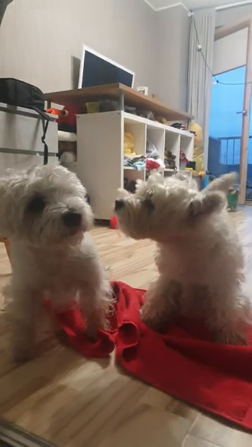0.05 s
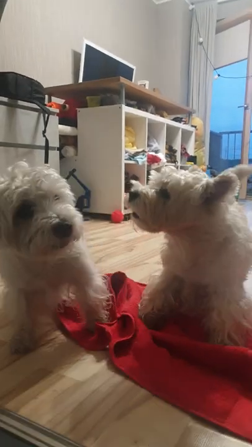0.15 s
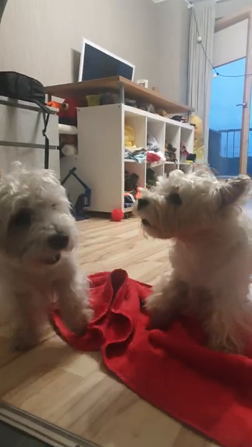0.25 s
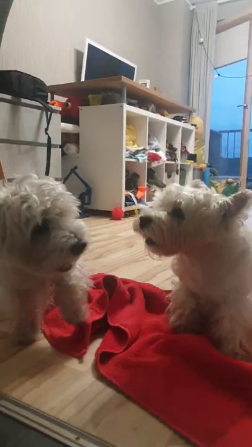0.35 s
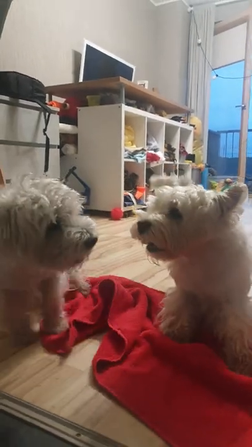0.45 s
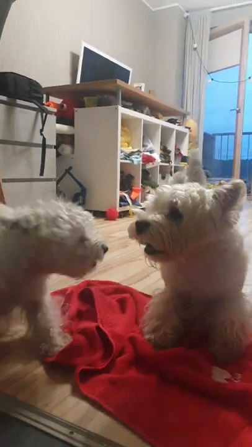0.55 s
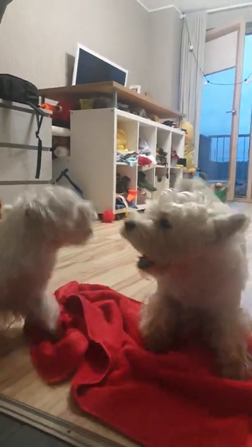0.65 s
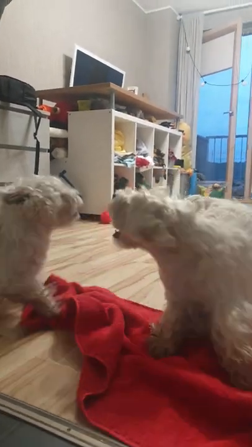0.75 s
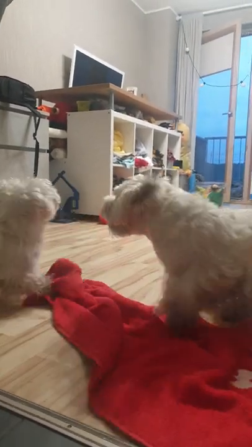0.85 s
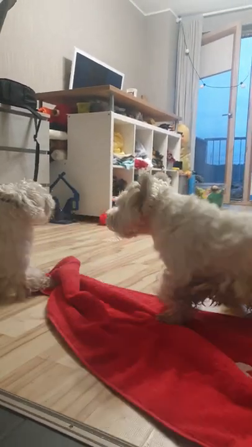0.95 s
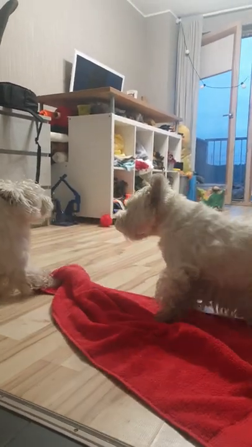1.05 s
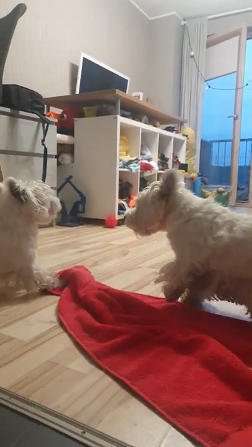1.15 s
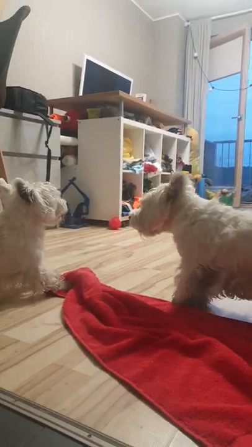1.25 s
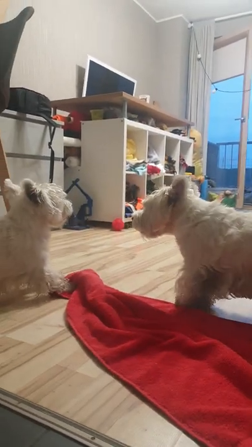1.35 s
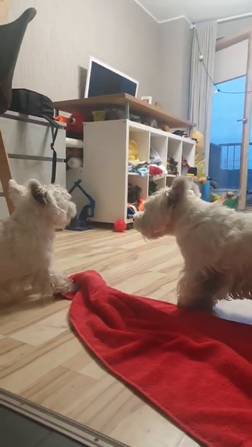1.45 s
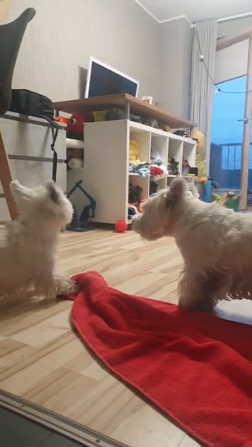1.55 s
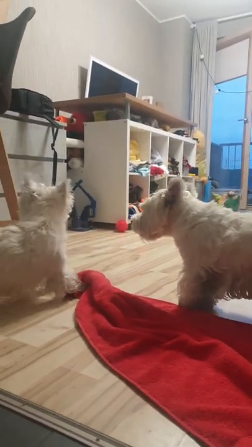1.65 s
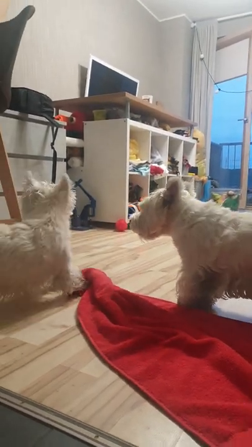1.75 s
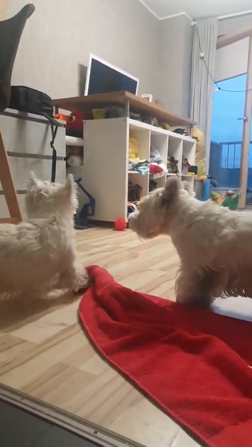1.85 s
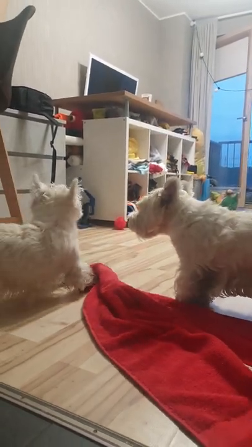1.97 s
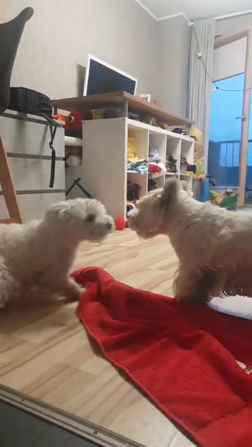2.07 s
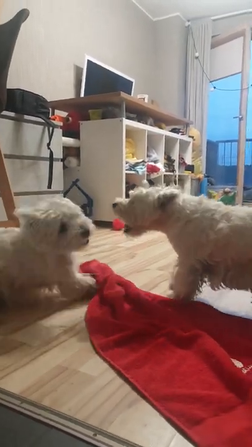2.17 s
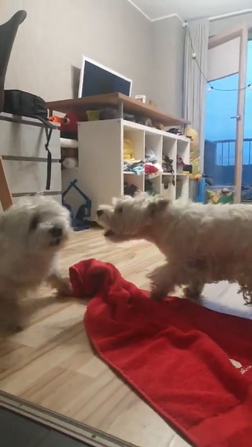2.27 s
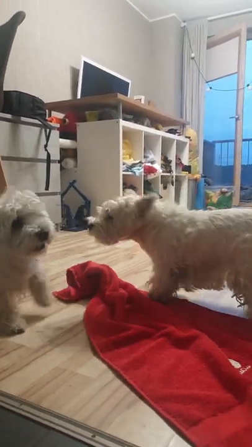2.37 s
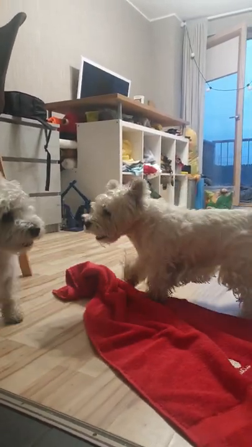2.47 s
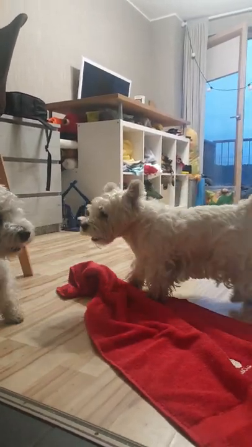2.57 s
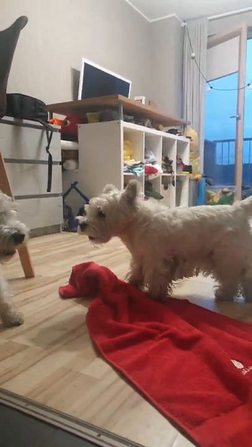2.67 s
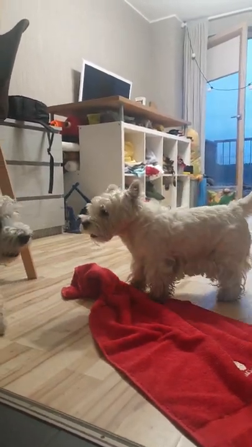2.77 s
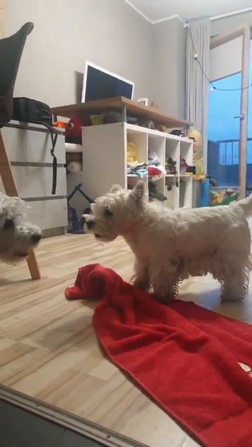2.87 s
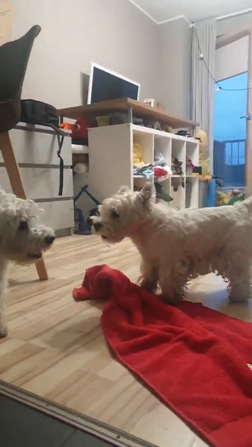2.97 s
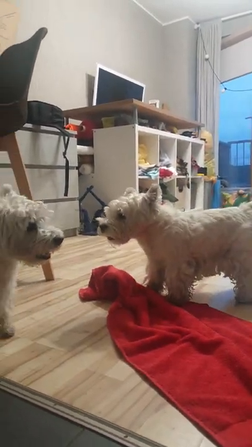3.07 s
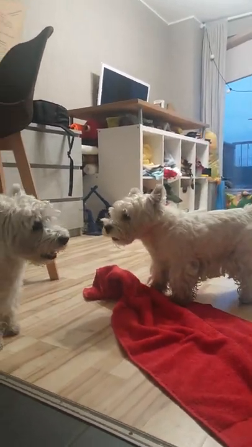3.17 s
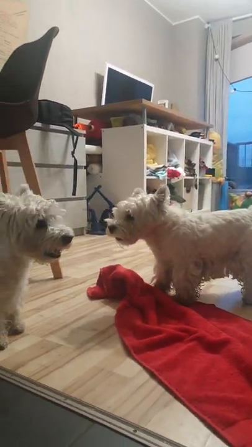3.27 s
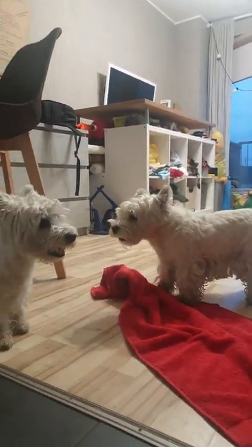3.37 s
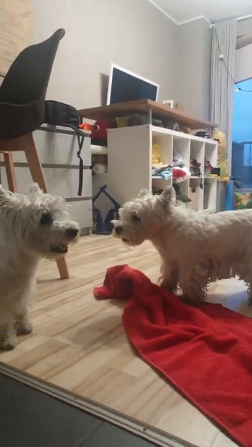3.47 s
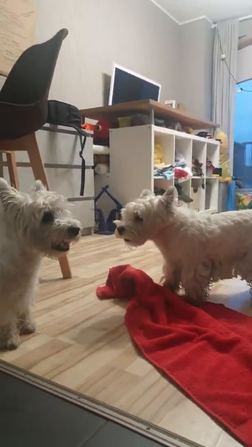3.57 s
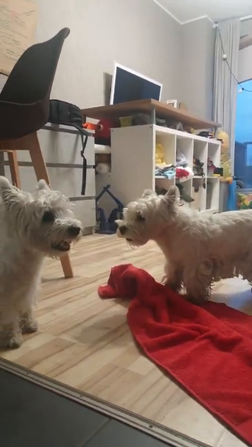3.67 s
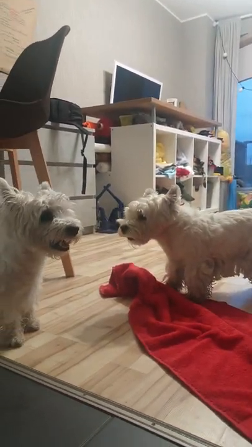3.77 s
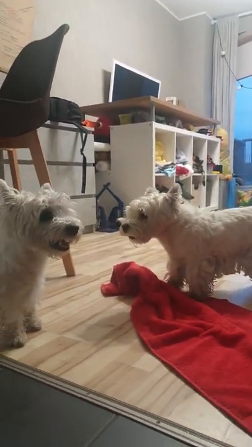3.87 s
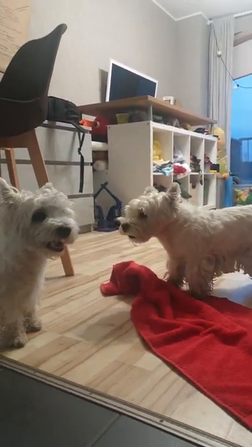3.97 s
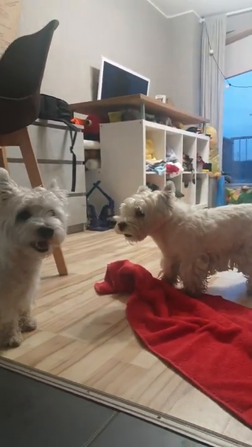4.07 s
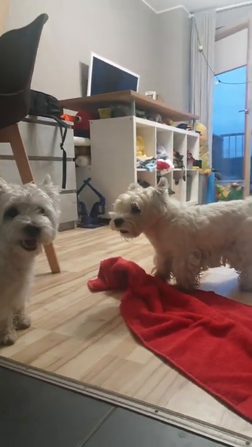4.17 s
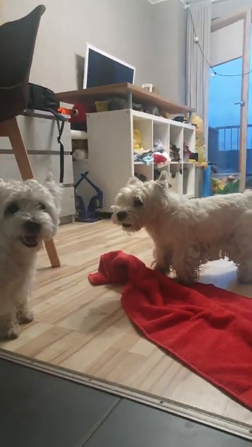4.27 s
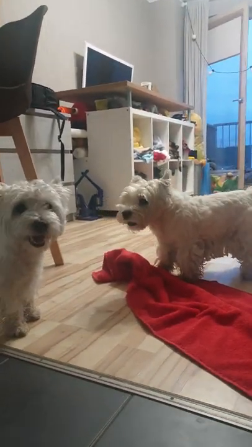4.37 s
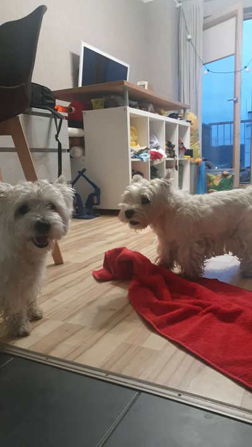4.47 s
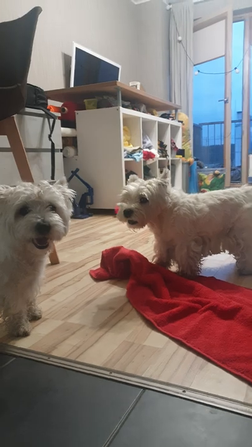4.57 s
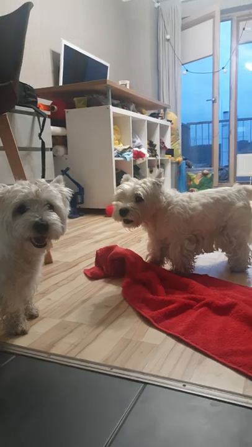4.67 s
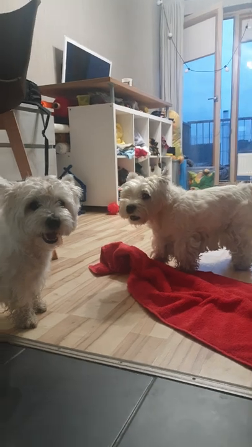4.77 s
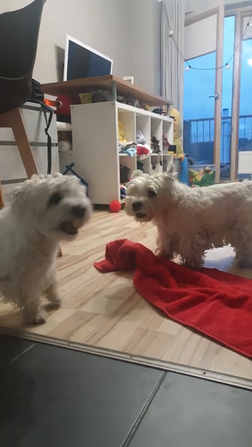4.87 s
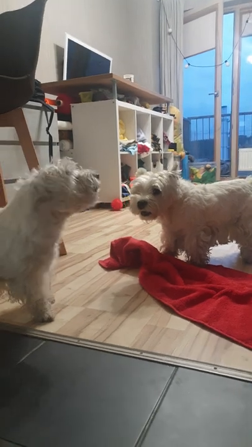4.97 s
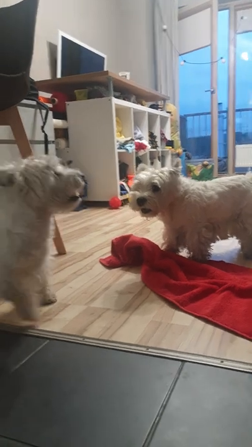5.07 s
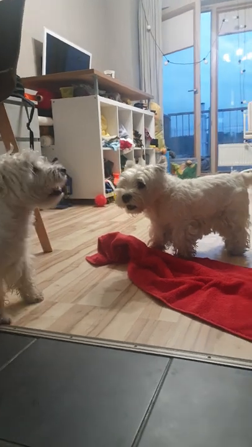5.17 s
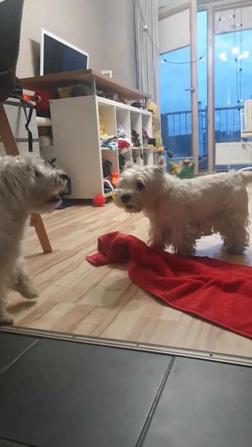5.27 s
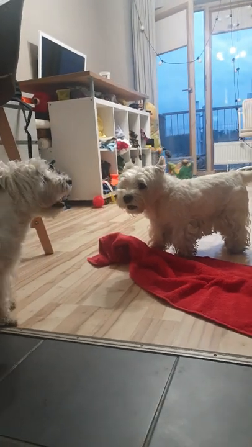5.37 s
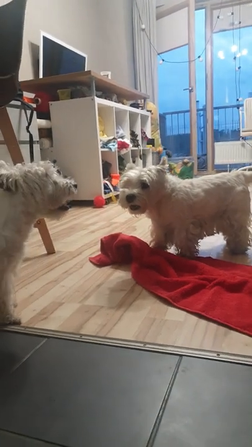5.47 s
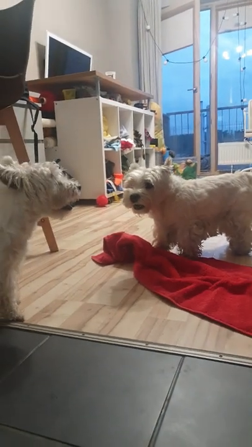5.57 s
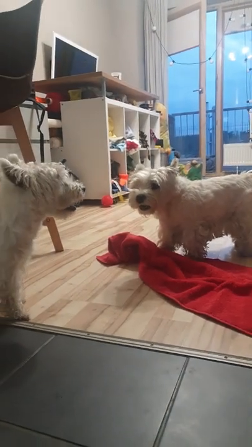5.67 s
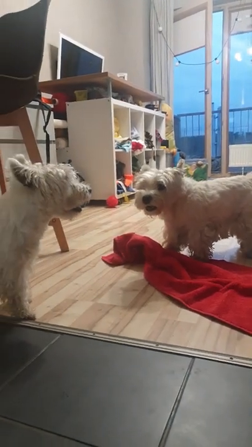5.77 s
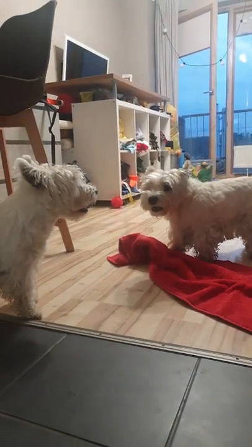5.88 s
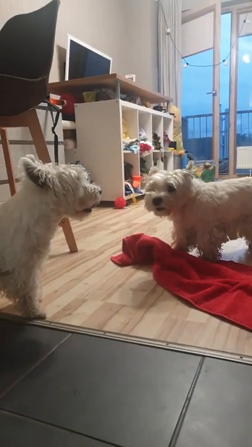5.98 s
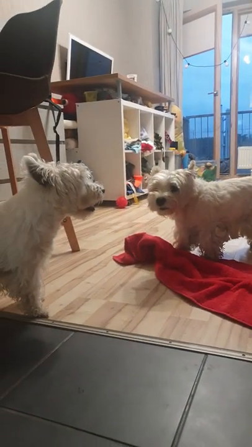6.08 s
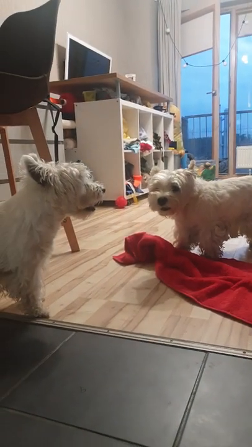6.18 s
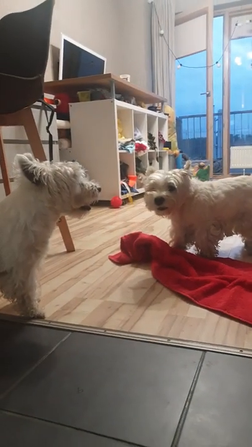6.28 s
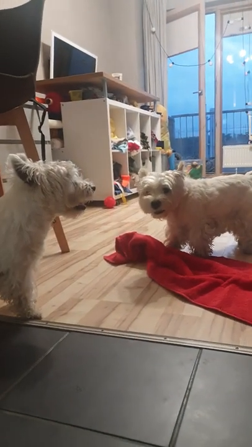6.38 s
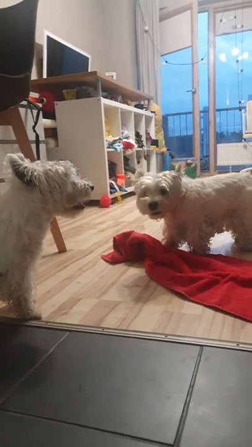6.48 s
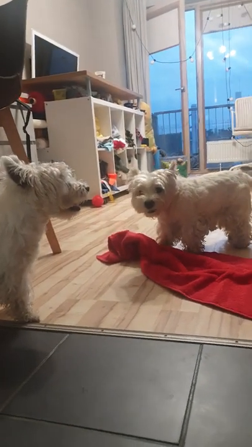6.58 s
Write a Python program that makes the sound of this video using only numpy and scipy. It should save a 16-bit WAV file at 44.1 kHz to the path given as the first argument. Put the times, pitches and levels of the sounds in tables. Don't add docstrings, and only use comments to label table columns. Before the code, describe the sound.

Two sharp small-dog barks, about a second and a half apart, ring through a quiet living room amid ticking claws, paw thumps and soft snorts.

```python
import sys
import numpy as np
from scipy import signal
from scipy.fft import rfft, irfft, next_fast_len
from scipy.io import wavfile
from scipy.ndimage import uniform_filter1d, minimum_filter1d

SR = 44100
rng = np.random.default_rng(int(sys.argv[2]) if len(sys.argv) > 2 else 0)


def wav_out(sig):
    wavfile.write(sys.argv[1], SR, np.round(np.clip(np.atleast_2d(sig).T, -1, 1) * 32767).astype(np.int16))


def decibels_to_gain(level_db):
    exponent = np.asarray(level_db, float) / 20
    return 10 ** exponent


N = 292277

# (time [s], effort [dB], pitch [Hz], mouth opening [dB])
BARKS = [
    [(.752, -56.5, 217.7, -14), (.78, -26.5, 280.5, -5), (.8, -16, 309.3, 0), (.83, -13.5, 380.7, 5),
     (.855, -15.5, 383.7, 9.5), (.875, -17, 373, 2.5), (.895, -15.5, 393.8, -7.5), (.915, -55.5, 368, -9.5)],
    [(2.17, -49, 231, -8), (2.205, -28.5, 304, -3.5), (2.225, -15.5, 311.5, -6), (2.245, -15, 322.9, 5),
     (2.265, -10.5, 420, 2.5), (2.292, -18, 514.5, 3.5), (2.315, -15, 526, -5.5),
     (2.345, -21.5, 534.6, -14.5), (2.37, -40, 545, -18.5)],
]
# (centre [Hz], width [Hz], level [dB])
BARK_THROATS = [
    [(714.4, 240, -15), (1141, 160, -0.5), (1484, 200, 1), (2234, 260, -4.5), (2987, 480, -17.5),
     (3840, 420, -20.5)],
    [(750, 130, -6), (1156, 200, 1), (1484, 390, -0.5), (2041, 470, -2), (2940, 410, -3), (3600, 600, -7.5)],
]
# (left over right [dB], right capsule lag [samples])
BARK_PLACES = [
    (1.5, 1),
    (-5, 4.3),
]
# (roughness at start [0-1], clearing [per s], clearest [0-1])
BARK_HOARSENESS = [
    (.75, 5, .4),
    (.9, 4.2, .2),
]
# (opening at start [dB], closing [dB per s])
BARK_JAWS = [
    (12, 149),
    (-8, 33),
]
# (frequency [Hz], density [dB per Hz])
BARK_AIR_COLOUR = [(600, -36.5), (3000, -12.5), (4500, -1.5), (7000, -2), (8600, -10), (10500, -8.5),
                   (12500, -4), (15500, -12), (17000, -40.5)]
BARK_AIR_DB = [-31.5, -29]
BARK_CHEST_DB = [-11, -11.5]
# (time [s], length [s], level [dB], pitch [Hz], sag [Hz per s])
GRUNTS = [
    (0, 0.058, -33, 198.4, 150),
    (1.056, 0.16, -41.5, 154, 289),
    (2.633, 0.116, -52.5, 142.3, 150),
    (4.903, 0.045, -43.5, 111, 30),
]
# (time [s], length [s], level [dB])
HUFF = (6.3, .1, -40)
# (centre [Hz], width [Hz], level [dB])
HUFF_THROAT = [(604, 200, -6), (1150, 116, -1.5), (2240, 300, 0.5), (3260, 155, -3), (4000, 170, -8.5)]
# (time [s], length [s], peak [dB], resonance [Hz], left over right [dB])
SNORTS = [
    (0.352, 0.16, -52, 1604, -13),
    (2.694, 0.14, -56.5, 1603, -2.5),
    (4.868, 0.092, -51, 1960, -9),
    (5.093, 0.19, -40.5, 1720, -5),
    (5.505, 0.12, -39, 2010, -7),
]
# (time [s], length [s], level [dB])
NOSE_AIR = [
    (5.0, 0.11, -56),
    (5.147, 0.079, -52),
    (5.435, 0.062, -46),
    (6.306, 0.062, -47.5),
]
# (time [s], peak [dB], low part [dB], left over right [dB])
CLAWS = [(0.1196, -34, -14.5, -9.5), (0.3619, -40, -2.5, -3), (0.5102, -42, -44, -4),
         (0.5773, -39.5, -6, 14), (0.5875, -28.5, -6.5, -14.5), (0.7173, -40.5, -26, -17),
         (1.0256, -35.5, -17.5, -1), (2.0206, -59.5, -15.5, -12), (2.0996, -27, -10, 1.5),
         (2.1244, -42, -15, -21), (2.328, -29, -12, -7), (2.4094, -34, -19, -6), (2.476, -32.5, -24, -3.5),
         (2.5242, -42.5, -10.5, 9), (2.667, -56.5, -16.5, -6), (2.9, -45.5, -13.5, -6.5),
         (2.924, -49, -19, -4), (3.5026, -57.5, -26, -10.5), (4.8828, -51, -10, -1), (4.9137, -50, -11, -5),
         (5.0004, -28.5, -8.5, 6), (5.026, -33.5, -28, -19), (5.1534, -37.5, -5.5, -28.5),
         (5.4316, -47.5, -6.5, -29.5)]
# (time [s], peak [dB], left over right [dB])
TIPS = [
    (.5882, -18, -9.5),
    (.523, -48, -4.5),
    (4.889, -50.5, -9),
    (4.977, -44, -15),
    (5.15, -29.5, -14),
]
# (time [s], peak [dB], pitch [Hz], 60 dB decay [s])
THUMPS = [(0.34, -51, 113, 0.17), (0.576, -33.5, 344, 0.047), (0.685, -45.5, 218, 0.061),
          (0.89, -42, 226.5, 0.19), (0.989, -48, 198, 0.062), (2.095, -39, 284, 0.043),
          (2.14, -45.5, 152.5, 0.25), (2.328, -29.5, 243, 0.058), (2.412, -36, 390, 0.024),
          (2.482, -44.5, 365, 0.052), (2.69, -46, 220, 0.076), (5, -41, 284, 0.088),
          (5.169, -30.5, 201, 0.067), (5.603, -44, 87, 0.077), (5.724, -57, 121.5, 0.078),
          (6.352, -19.5, 225, 0.028), (6.596, -43, 88, 0.096)]
# (time [s], peak [dB], pitch [Hz], 60 dB decay [s])
KNOCKS = [
    (0.588, -40, 531, 0.07),
    (2.1, -45.5, 586, 0.04),
    (2.664, -51, 598, 0.038),
    (5.0, -43.5, 627, 0.06),
    (5.148, -50.5, 455, 0.18),
    (6.336, -36.5, 483.4, 0.093),
]
# (time [s], length [s], hiss [dB], dull part [dB], left over right [dB])
SCUFFS = [(0, 0.057, -44, 15.5, -7.5), (.37, 0.13, -49.5, 0.5, 2), (0.521, .06, -44.5, -24, -3),
          (0.607, 0.068, -50, -11, -1), (0.711, 0.072, -42, -14, 8), (2.114, 0.18, -45.5, -3, -6),
          (4.913, 0.094, -47.5, -2, -13), (4.996, 0.11, -35.5, -25, -19.5), (5.156, .12, -40, -7, 14),
          (5.435, 0.12, -36.5, -7.5, -4.5), (6.318, .11, -37, -2, -13)]
# (frequency [Hz], density [dB per Hz])
SLIDE_HISS = [(1760, -36), (3000, -7), (4230, -5.5), (4730, -3.5), (6570, -8), (7940, -17), (11600, -19.5),
              (16000, -27.5)]
# (time [s], half length [s], level [dB])
RUSTLES = [(0, 0.37, -69), (2.054, .04, -72), (2.744, 0.04, -58.5), (2.932, 0.029, -60), (3.851, .25, -76),
           (4.7, 0.23, -80), (5.477, 0.034, -52)]
# (frequency [Hz], 60 dB decay [s])
ROOM_T60 = [(120, 0.36), (400, 0.45), (1000, 0.42), (2500, 0.41), (6000, 0.39), (14000, 0.35)]
# (centre [Hz], width [Hz], level [dB])
ROOM_BOOM = [(67, 14, -2.5), (94, 12, 0.5), (150, 42, 4.5), (216.2, 20, 1), (285.2, 25, 8)]
# (time [s], level [dB])
TRAFFIC = [(0, -69), (.6, -63.5), (1.2, -62), (1.45, -73.5), (1.8, -73.5), (2.15, -64.5), (2.6, -67),
           (3.1, -70.5), (3.45, -69.5), (3.9, -65.5), (4.2, -68.5), (4.63, -65.5), (4.95, -59),
           (5.3, -56.5), (5.7, -53.5), (6.63, -53.5)]
# (frequency [Hz], density [dB per Hz])
TRAFFIC_COLOUR = [(15, -64), (25, -37.5), (53, -5.5), (84, -3.5), (123, -11.5), (212, -10), (236, -15.5),
                  (270, -7.5), (344, -23), (1020, -18), (1100, -20), (2050, -26.5), (7310, -50),
                  (8360, -61), (16000, -53.5)]
# (level at mean loudness [dB], share of the swell [ratio])
TRAFFIC_LAYERS = [
    (7.5, 0.85),
    (-0.3, 0.9),
    (-17, 1.204),
]
# (frequency [Hz], likeness [0-1])
LIKENESS = [(60, 1), (180, 0.85), (550, 0.43), (1650, 0.0), (4970, 0), (15000, 0.03)]
EDGES = 25 * 2 ** np.arange(0, 9.6, .5)

CLAW_HZ, TIP_HZ = 5350, 11500
TRAFFIC_MEAN_DB = -66
ROOM_DB, ROOM_BASS_CUT_HZ, TIP_ROOM_DB = 0.5, 550, -8.5
RIGHT_CAPSULE_DB, CAPSULE_HISS_DB = 3.5, -87.5
BASS_SHARED_HZ, TOP_CUT_HZ = 420, 16400
TREBLE_DIP_HZ, TREBLE_DIP = 9000, 0.46


def rms_one(x):
    return x / np.sqrt(np.mean(x ** 2) + 1e-20)


def at_hz(points, hz):
    table_hz, values = np.transpose(points)
    return np.interp(np.log(hz), np.log(table_hz), values)


def span(rows):
    s, *columns = np.transpose(rows)
    t = np.arange(s[0], s[-1], 1 / SR)
    return [np.interp(t, s, column) for column in columns]


def low_pass(order, hz):
    return signal.butter(order, hz, fs=SR, output="sos")


def band(x, low_hz, high_hz, order=2):
    edges = [low_hz, min(high_hz, SR / 2.1)]
    return signal.sosfilt(signal.butter(order, edges, "band", fs=SR, output="sos"), x)


def resonance(x, hz, width_hz):
    r = np.exp(-np.pi * width_hz / SR)
    feedback = [1, -2 * r * np.cos(2 * np.pi * hz / SR), r * r]
    return signal.lfilter(np.array([1, 0, -1]) * (1 - r * r) / 2, feedback, x)


def drift(size, rate_hz):
    r = np.exp(-2 * np.pi * rate_hz / SR)
    white = rng.standard_normal(size + 4000)
    return rms_one(signal.lfilter([1], [1, -2 * r, r * r], white)[4000:])


def coloured(size, spectrum):
    hz = np.fft.rfftfreq(size, 1 / SR) + 1
    return rms_one(irfft(rfft(rng.standard_normal(size)) * decibels_to_gain(at_hz(spectrum, hz)), size))


def swell(length, rise_s, fall_db_per_s, end_s):
    t = np.arange(round(length * SR)) / SR
    rise, fade = np.minimum(1, t / rise_s), np.minimum(1, t[::-1] / end_s)
    return t, rise * decibels_to_gain(-fall_db_per_s * t) * fade


def add(out, sound, s, pan_db, lag):
    i, steps = max(round(s * SR), 0), np.arange(len(sound))
    early = np.interp(steps - 20., steps, sound, left=0)
    late = np.interp(steps - 20 - lag, steps, sound, left=0)
    pair = np.array([early * decibels_to_gain(pan_db / 2), late * decibels_to_gain(-pan_db / 2)])[:, 20:][:, :N - i]
    out[:, i:i + pair.shape[1]] += pair


def bark(rows, hoarseness, jaw, throat, air_db, chest_db):
    effort_db, pitch, mouth_db = span(rows)
    hoarse, clearing, clearest = hoarseness
    open_db, closing = jaw
    size = len(pitch)
    t = np.arange(size) / SR
    rough = np.clip(hoarse - clearing * t, clearest, 1)
    jaw_db = open_db - closing * t

    phase = 2 * np.pi * np.cumsum(pitch * (1 + .07 * rough * drift(size, 70))) / SR
    pulses = sum(np.cos(k * phase + 0.319 * k * k) * decibels_to_gain(3.5 * rough * drift(size, 140))
                 for k in range(1, 13)) / np.sqrt(6)
    gate = 1 + .7 * np.cos(phase)
    source = (1 - rough) * pulses + 1.1 * rough * gate * rng.standard_normal(size)

    peaks = []
    for k, (hz, width, db) in enumerate(throat):
        ringing = resonance(resonance(source, hz, 2 * width), hz, 2 * width)
        peaks.append(decibels_to_gain(db) * (-1) ** k * ringing)
    nose, low, high, *mouth = peaks
    voice = rms_one(nose + decibels_to_gain(-jaw_db / 2) * low + decibels_to_gain(jaw_db / 2) * high + decibels_to_gain(mouth_db) * sum(mouth))
    voice = signal.sosfilt(low_pass(6, 3830), voice)

    air = decibels_to_gain(air_db + 0.15 * mouth_db) * gate * coloured(size, BARK_AIR_COLOUR)
    chest = band(pulses + 5.9 * rough * rng.standard_normal(size), 260, 910)
    chest *= decibels_to_gain(chest_db - .12 * (pitch - 323.5))
    return decibels_to_gain(effort_db) * (voice + air + chest)


def grunt(length, level_db, pitch_hz, sag):
    t, envelope = swell(length, 0.0085, 97, 0.01)
    pitch, size = pitch_hz - sag * t, len(t)
    second_db = 2.5 - .2 * (pitch - 110)
    phase = 2 * np.pi * np.cumsum(pitch * (1 + 0.05 * drift(size, 57))) / SR
    upper = sum(np.sin(k * phase + k * k) * decibels_to_gain(2.9 * drift(size, 86)) for k in range(3, 9))
    voice = np.sin(phase) + decibels_to_gain(second_db) * np.sin(2 * phase) + decibels_to_gain(-25) * upper
    return decibels_to_gain(level_db) * envelope * voice


def huff(length, level_db):
    t, envelope = swell(length, .03, 70, 0.046)
    air = envelope * rng.standard_normal(len(t))
    peaks = [decibels_to_gain(db) * (-1) ** k * resonance(air, hz, width)
             for k, (hz, width, db) in enumerate(HUFF_THROAT)]
    return decibels_to_gain(level_db) * rms_one(sum(peaks))


def snort(length, peak_db, hz):
    envelope = swell(length, .025, 71.5, 0.067)[1]
    return decibels_to_gain(peak_db - 1.5) * turbulence(envelope, hz, 0, -11.5, -15.5)


def nose_air(length, level_db):
    envelope = swell(length, 0.023, 40.7, 0.057)[1]
    return decibels_to_gain(level_db) * envelope * rms_one(band(rng.standard_normal(len(envelope)), 9000, 17600))


def turbulence(envelope, centre_hz, body_db, hiss_db, low_db):
    size = len(envelope)
    grain = rng.standard_normal(size) * decibels_to_gain(2.2 * drift(size, 120))
    body = rms_one(resonance(grain, centre_hz, 550) - .8 * resonance(grain, 1.5 * centre_hz, 550))
    hiss = coloured(size, SLIDE_HISS)
    low = rms_one(band(grain, 350, 1300))
    return envelope * (decibels_to_gain(body_db) * body + decibels_to_gain(hiss_db) * hiss + decibels_to_gain(low_db) * low)


def claw(peak_db, hz, low_db):
    t = np.arange(round(0.085 * SR)) / SR
    decay = np.exp(-t / .0015) + 0.38 * np.exp(-t / 0.021)
    ringing, scrape = rng.standard_normal((2, len(t))) * decay
    tick = 2.4 * resonance(ringing, hz, 1800) + .5 * band(scrape, 2400, 15000)
    return decibels_to_gain(peak_db - 5.0) * (tick + decibels_to_gain(low_db + 9.5) * band(scrape, 600, 2900))


def tip(peak_db):
    t = np.arange(round(.02 * SR)) / SR
    burst = rng.standard_normal(len(t)) * np.exp(-t / .0012)
    return decibels_to_gain(peak_db) * (resonance(burst, TIP_HZ, 3000) + .6 * band(burst, 4500, 11000))


def thump(peak_db, hz, t60):
    t = np.arange(round(.3 * SR)) / SR
    fall = decibels_to_gain(-60 * t / t60) * (1 - np.exp(-t / 0.0022))
    puff = rms_one(band(rng.standard_normal(len(t)), 100, 710)) * fall
    panel = np.sin(2 * np.pi * hz * t) + 0.55 * np.sin(2 * np.pi * 1.2 * hz * t)
    return decibels_to_gain(peak_db + 6.0) * fall * (panel + 0.19 * puff)


def scuff(length, hiss_db, low_db):
    envelope = swell(length, 0.003, 119.5, 0.079)[1]
    return decibels_to_gain(hiss_db - 8) * turbulence(envelope, 1970, -14.5, 0, low_db)


def rustle():
    t = np.arange(N) / SR
    swells = sum(decibels_to_gain(db) * np.exp(-((t - s) / half) ** 2) for s, half, db in RUSTLES)
    hiss = coloured(next_fast_len(2 * N, True), SLIDE_HISS)[:2 * N].reshape(2, N)
    return swells * decibels_to_gain(1.4 * drift(N, 60)) * hiss


def room(x):
    t = np.arange(round(.7 * SR)) / SR
    mid, side = rng.standard_normal((2, len(t)))
    echoes = np.array([mid + band(side, 360, 23000), mid - band(side, 300, 20000)])
    tail = sum(band(echoes, low, high) * decibels_to_gain(-60 * t / at_hz(ROOM_T60, np.sqrt(low * high)))
               for low, high in zip(EDGES, EDGES[1:]))
    tail = band(tail, ROOM_BASS_CUT_HZ, 22000, order=1)
    tail *= np.clip((t - .004) / 0.016, 0, 1)
    tail /= np.sqrt(np.sum(tail ** 2) / 2)
    return decibels_to_gain(ROOM_DB) * signal.fftconvolve(x.mean(axis=0)[None], tail, axes=1)[:, :N]


def traffic():
    layers, white = np.zeros((3, 2, N)), rng.standard_normal((2, 2, N))
    for k, (low, high) in enumerate(zip(EDGES, EDGES[1:])):
        hz = np.sqrt(low * high)
        mid, side = band(white[k % 2], low, high)
        alike = np.clip(at_hz(LIKENESS, hz), 0, 1)
        gain = decibels_to_gain(at_hz(TRAFFIC_COLOUR, hz) + 0.5 * drift(N, 18))
        pair = np.sqrt(1 + alike) * mid + np.sqrt(1 - alike) * side * [[1], [-1]]
        layers[int(hz > 350) + int(hz > 2800)] += gain * pair
    rumble = layers[0]
    boom = sum(decibels_to_gain(db) * resonance(rumble, hz, width) for hz, width, db in ROOM_BOOM)
    layers[0] += decibels_to_gain(16.5) * boom * np.std(rumble) / np.std(boom) / 2
    swing = np.interp(np.arange(N) / SR, *np.transpose(TRAFFIC)) - TRAFFIC_MEAN_DB
    gains = [decibels_to_gain(TRAFFIC_MEAN_DB + db + share * swing) for db, share in TRAFFIC_LAYERS]
    return sum(gain * rms_one(layer) for gain, layer in zip(gains, layers))


def scene():
    dogs, near = np.zeros((2, 2, N))
    barks = zip(BARKS, BARK_HOARSENESS, BARK_JAWS, BARK_THROATS, BARK_AIR_DB, BARK_CHEST_DB)
    for voice, (pan_db, lag) in zip(barks, BARK_PLACES):
        add(dogs, bark(*voice), voice[0][0][0], pan_db, lag)
    for s, *voice in GRUNTS:
        add(dogs, grunt(*voice), s, -1.5, 1.5)
    add(dogs, huff(*HUFF[1:]), HUFF[0], -7, 1.6)
    for s, *breath, pan_db in SNORTS:
        add(dogs, snort(*breath), s, pan_db, 1.6)
    for s, *breath in NOSE_AIR:
        add(dogs, nose_air(*breath), s, -6, .3)
    for s, peak_db, low_db, pan_db in CLAWS:
        add(dogs, claw(peak_db, CLAW_HZ * rng.uniform(0.77, 0.98), low_db), s, pan_db, 1.11)
    for s, peak_db, pan_db in TIPS:
        add(near, tip(peak_db), s, pan_db, .4)
    for s, *landing in [*THUMPS, *KNOCKS]:
        add(dogs, thump(*landing), s, 0, 0)
    for s, *friction, pan_db in SCUFFS:
        add(dogs, scuff(*friction), s, pan_db, .7)
    dogs = dogs + rustle()
    around = room(dogs + decibels_to_gain(TIP_ROOM_DB) * near) + traffic()
    return dogs + near + around * decibels_to_gain([[-RIGHT_CAPSULE_DB / 2], [RIGHT_CAPSULE_DB / 2]])


def top_cut(x):
    return signal.sosfilt(signal.butter(12, 16830, fs=SR, output="sos"), x)


def record(dry):
    bass = signal.sosfiltfilt(low_pass(2, BASS_SHARED_HZ), dry)
    hiss = decibels_to_gain(CAPSULE_HISS_DB) * band(rng.standard_normal((2, N)), 9000, 17000)
    capsules = dry - 0.35 * (bass - bass.mean(axis=0)) + hiss
    capsules = capsules - TREBLE_DIP * resonance(capsules, TREBLE_DIP_HZ, 1800)
    safe_gain = np.minimum(1, .97 / (np.abs(capsules).max(axis=0) + 1e-9))
    held = capsules * uniform_filter1d(minimum_filter1d(safe_gain, size=261), size=131)
    mix = signal.sosfilt(signal.cheby2(12, 60, TOP_CUT_HZ, fs=SR, output="sos"), held)
    return top_cut(mix)


dry = scene()
out = record(dry)
wav_out(out)
```